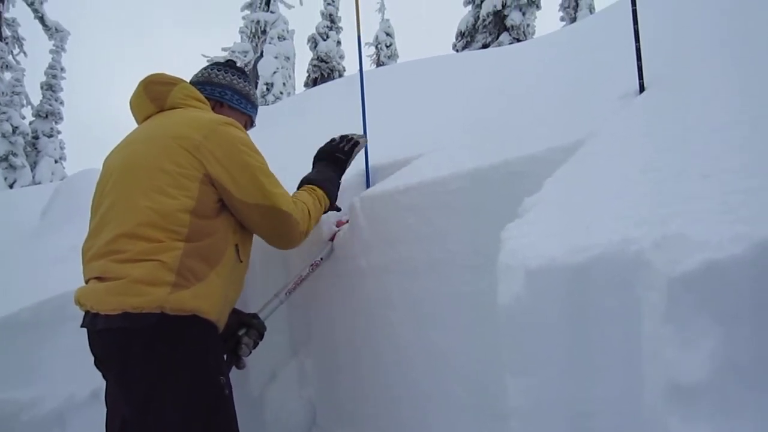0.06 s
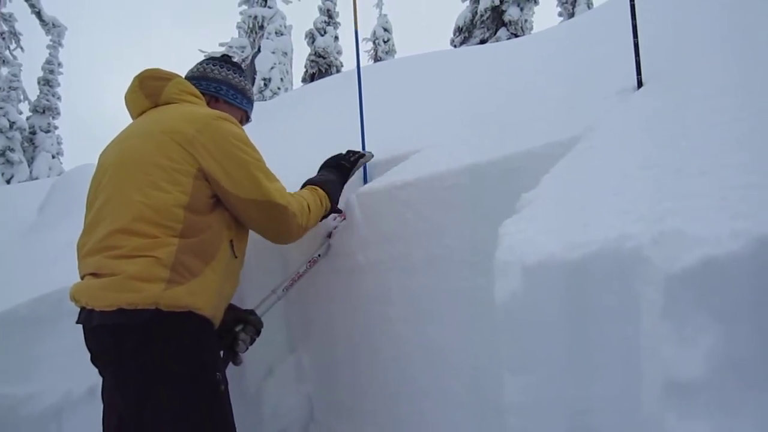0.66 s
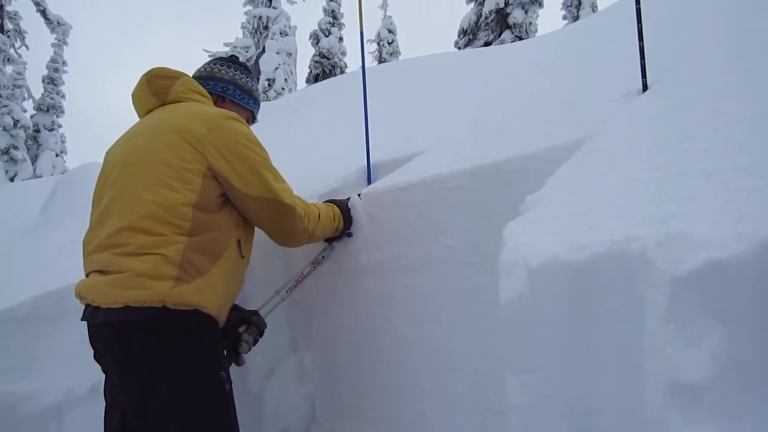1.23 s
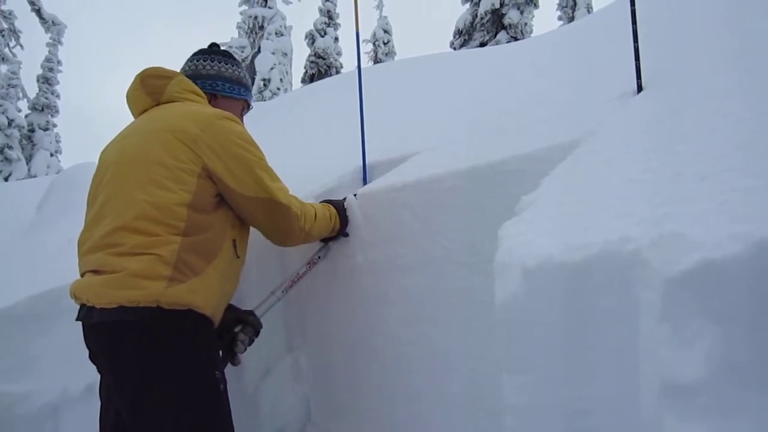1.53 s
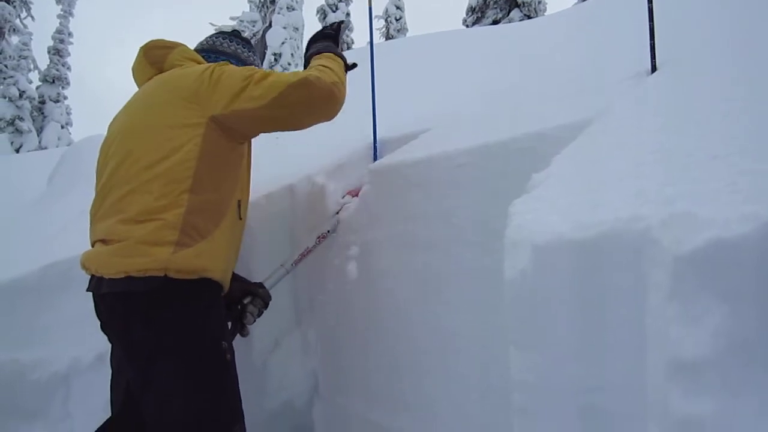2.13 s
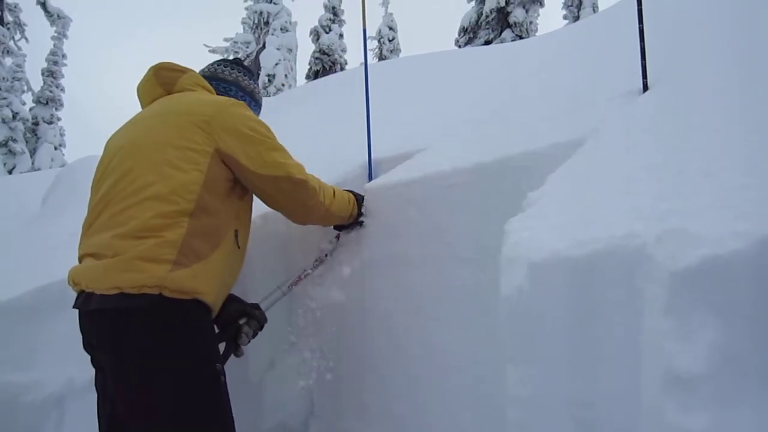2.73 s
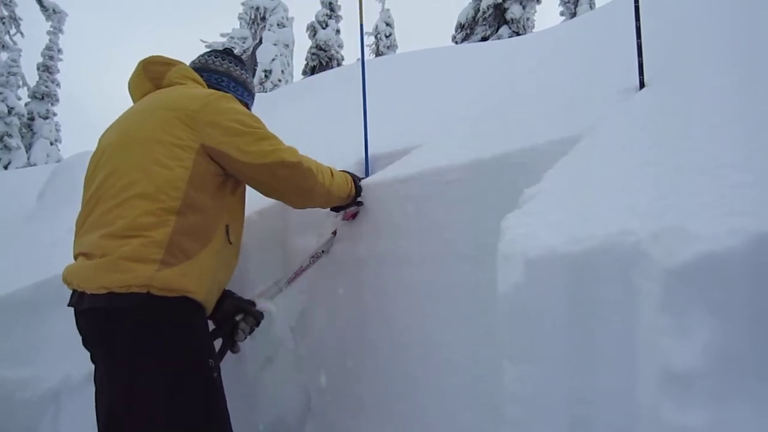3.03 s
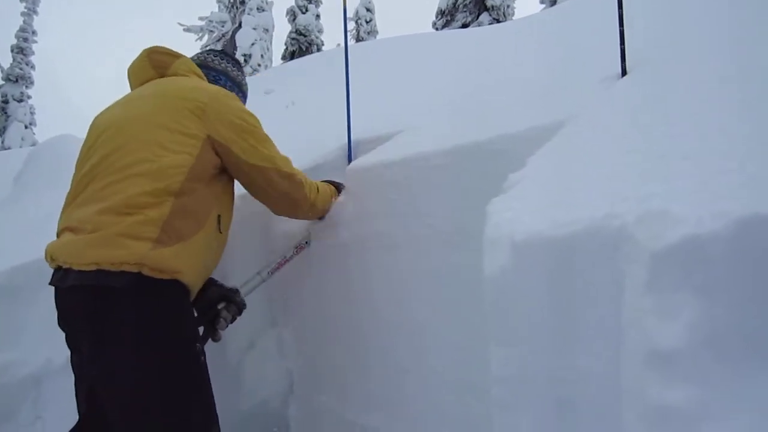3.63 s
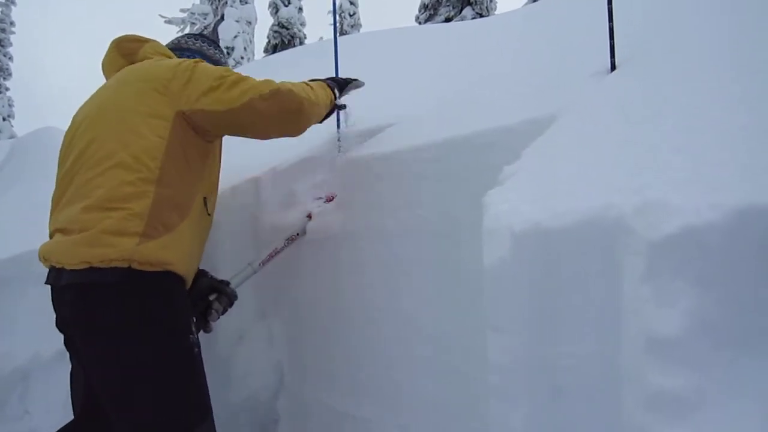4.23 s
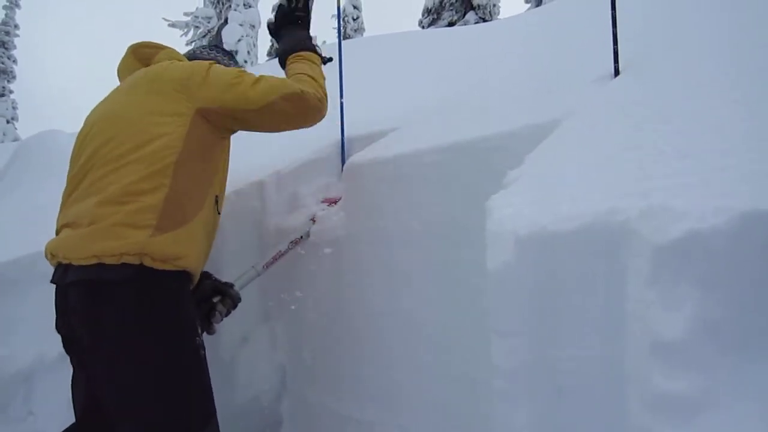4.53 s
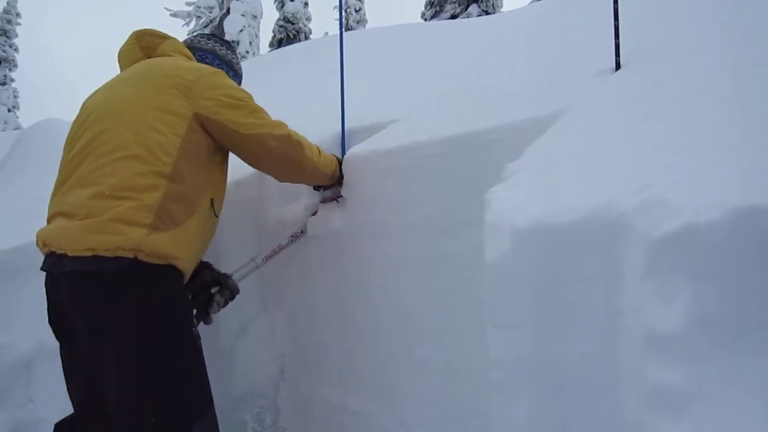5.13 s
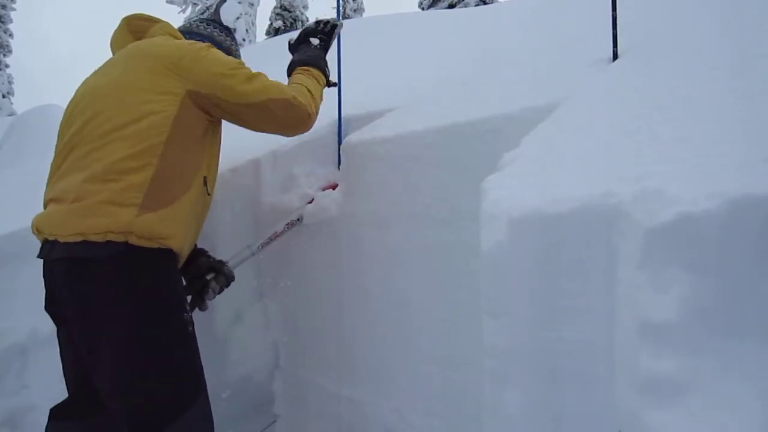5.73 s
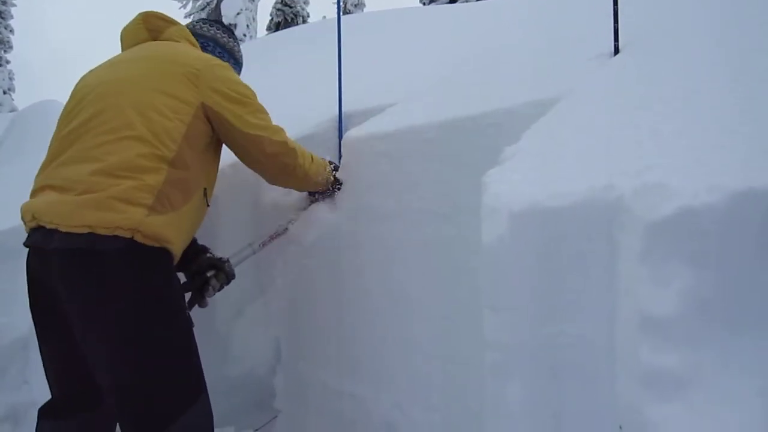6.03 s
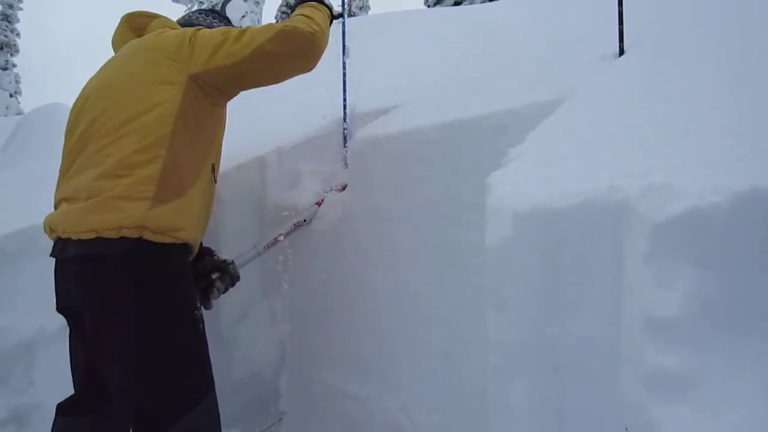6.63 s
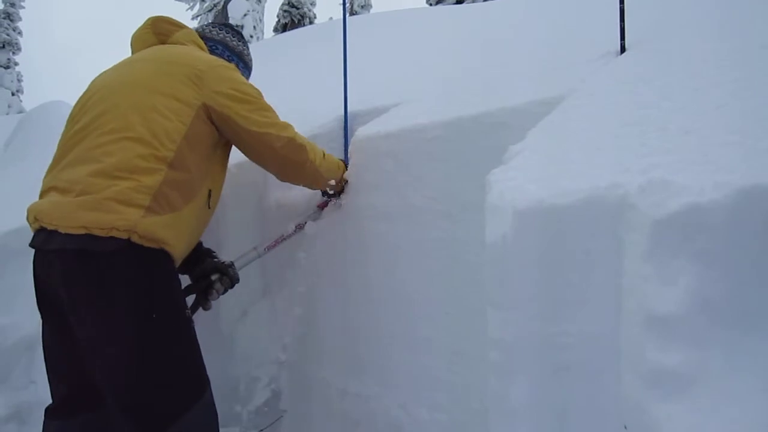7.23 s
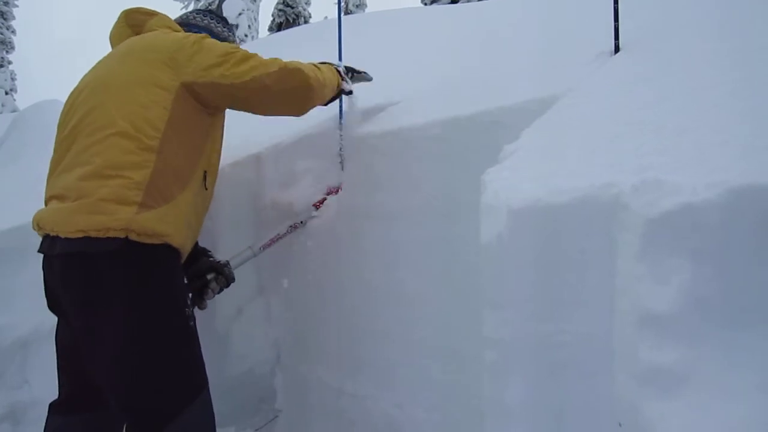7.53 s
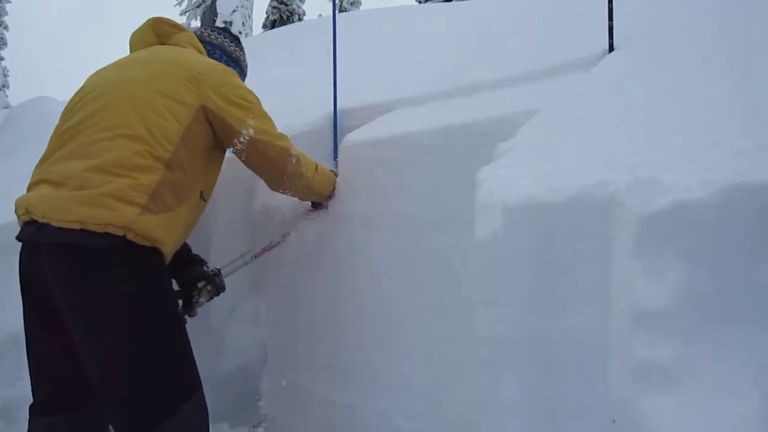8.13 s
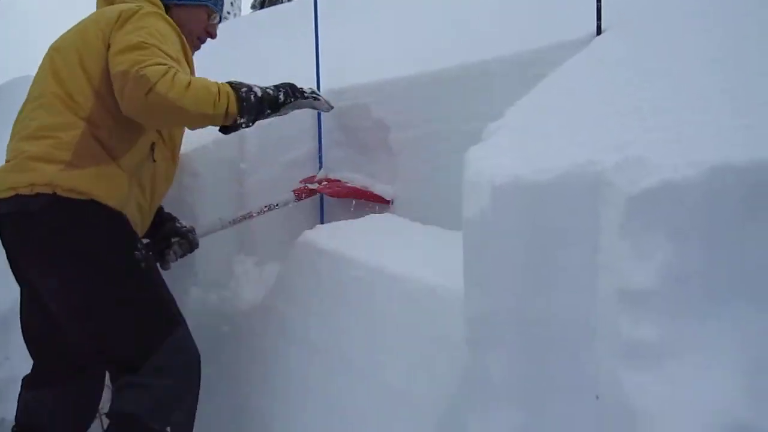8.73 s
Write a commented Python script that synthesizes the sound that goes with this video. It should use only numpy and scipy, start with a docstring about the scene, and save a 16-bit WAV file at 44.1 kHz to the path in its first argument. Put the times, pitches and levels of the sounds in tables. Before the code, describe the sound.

A gloved hand slaps a metal shovel on snow, twice lightly and six times hard, then a snow slab slides off with a grainy hiss.

```python
"""An open snow pit. A gloved hand slaps a metal shovel blade lying on a snow column: two light taps,
then six hard blows, the hardest of which overload the microphone. Each impact excites the blade's modes,
the snow damps them at once, and the slope returns dull echoes. A jacket swishes by friction as the arm
lifts and falls, loose gear knocks and crumbs of snow patter. At the last blow the column breaks and the
slab slides off with a grainy hiss."""
import sys
import numpy as np
from scipy import signal
from scipy.fft import rfft, irfft
from scipy.io import wavfile
from scipy.ndimage import uniform_filter1d

SR = 44100
rng = np.random.default_rng(int(sys.argv[2]) if len(sys.argv) > 2 else 0)


def put_to_file(sound):
    """Save the sound as 16-bit audio at rate SR, in the file named by the first command-line argument."""
    columns = np.atleast_2d(sound).T  # one column per channel
    safe = np.clip(columns, -1, 1)
    whole_steps = np.round(safe * 32767)
    wavfile.write(sys.argv[1], SR, whole_steps.astype(np.int16))


N = 386757
TIME = np.arange(N) / SR
AGE = TIME[:SR // 5]  # seconds since an impact

# The blows. Each row: start in seconds, force in dB, timing offset of the fingertip tick in seconds
# (0 for no tick), flex level in dB, flex frequency in Hz, crack level in dB, ring level in dB,
# bite level in dB, bite frequency in Hz.
BLOWS = [(0.1581, -20, .0026, -12.5, 770, -23.5, -27.5, -17.5, 3500),
         (1.1157, -16.5, .0027, -15, 810, -18, -31.5, -14, 3700),
         (2.538, -9.5, 0.00039, -2.5, 779, -10.5, -19.5, -14.5, 2020),
         (3.6258, -4.5, 0.00023, -3.5, 823, -12.5, -19.5, -5.5, 3250),
         (4.6835, -0.5, 0.000068, -5, 847, -9.5, -17.5, -13, 2340),
         (5.8375, -1, 0, -4.5, 890, -8.7, -22.5, -10, 1320),
         (6.9090, -2, 0.000093, -9, 820, -9, -21, -14, 3150),
         (7.9935, -1.5, 0, 0, 904.8, -10, -25, -14.5, 1245)]
# Modes. Each row: frequency in Hz, relative level in dB, time to decay by 60 dB (t60) in seconds.
BLADE_MODES = [(436, -2, 0.021), (527, -3.5, 0.034), (1138, -1.5, .025), (1478, -3.5, 0.034),
               (2222, -5.5, 0.038), (2430, -7, 0.029), (2744, 2.5, .035), (3042, -1, 0.035),
               (3370, -7.5, 0.042), (3910, -5, .034), (4650, -8, 0.047), (5440, -15, 0.051),
               (6630, -17, .04), (7500, -17, 0.053), (8050, -14, 0.027)]  # the blade, damped by snow
GEAR_MODES = [(765, 2, 0.024), (1020, -1, 0.015), (1270, -4, .025), (1709, -2, 0.017), (2200, -2.5, 0.02),
              (2480, 1.5, 0.0074), (3120, -4, 0.011), (4100, -11, .007), (5930, -2, 0.015),
              (6740, -3, .007)]  # loose gear
CLINK_MODES = [(2180, 0, 0.061), (3200, 1.5, 0.051), (3280, -2, 0.052)]  # a small metal part
# Echoes from slope and trees. Each row: delay in seconds, gain in dB, centre in Hz, filter width in Hz.
ECHOES = [(.0405, -36, 260, 200), (.0645, -26.5, 408, 190), (.0835, -32, 400, 150)]
# The sliding slab. Each row: time in seconds, base level of the grinding in dB, that of the fizz in dB.
SLIDE_LEVELS = [(8.02, -51, -48), (8.05, -45.5, -35), (8.07, -41, -34), (8.13, -44, -40.5),
                (8.332, -42.5, -44.5), (8.478, -44, -35), (8.584, -44.5, -39), (8.616, -41, -32),
                (8.76, -35.5, -37)]
# The shovel scuffing under the glove. Each row: start in seconds, level in dB, t60 in seconds.
RATTLES = [(0.507, -46, .015), (2.896, -43, .02), (2.93, -46, .034), (4.766, -38.5, .022),
           (4.776, -40.5, 0.053), (5.9176, -38, 0.068), (5.991, -43.5, .017), (6.992, -43, .05)]
# Clear knocks of the gear. Each row: start in seconds, level in dB, favoured frequency in Hz.
KNOCKS = [(1.9676, -29, 2220), (2.237, -45, 1370), (3.440, -46.5, 2700), (5.283, -43, 1100),
          (5.812, -44.5, 1000), (6.745, -45.5, 1100), (7.108, -49, 1100)]
# Sleeve rubs between blows. Each row: middle in seconds, half length in seconds, swish level in dB.
SLEEVE_RUBS = [(1.83, .043, -58), (2.05, .1, -63.5), (2.42, .025, -55), (2.643, 0.094, -59.5),
               (3.005, 0.027, -54.5), (3.056, 0.019, -50.5), (3.23, .03, -59.5), (4.117, .022, -53),
               (4.234, .0083, -52.5), (5.2, .03, -57), (6.331, .018, -52.5), (6.384, .014, -49.5),
               (6.56, .03, -60.5), (7.02, .085, -54), (7.368, 0.054, -53.5), (7.409, .028, -52)]
# Lift, downswing and follow-through at full force. Each row: middle in seconds after the blow,
# half length in seconds, swish level in dB, rustle level in dB.
ARM_SWING = [(-.45, .16, -72, -63.5), (-.025, 0.037, -59.5, -60), (0.062, 0.092, -58.5, -58)]
# The jacket's continuous rustle. Each row: time in seconds, level in dB.
RUSTLE_LEVELS = [(0, -58), (.17, -54.5), (.6, -73), (1.7, -75), (2.3, -63), (5.2, -63), (6.1, -72),
                 (8, -68)]
# Noise spectra. Each row: frequency in Hz, relative spectral density in dB.
CRACK_SPECTRUM = [(100, -12), (330, 0.5), (520, 13.5), (1000, -5), (1400, 5), (1800, -8.5), (2900, -3),
                  (4200, -3.5), (5000, -5), (7300, -5), (8800, -11.5), (10300, -9.5), (13000, -18),
                  (16000, -28)]  # glove on metal
GRIND_SPECTRUM = [(60, -27), (220, -11.5), (450, -12), (750, -1.5), (1080, 1.5), (1300, -1.5), (1500, -7.5),
                  (1750, -3.5), (2200, -21.5), (5000, -37)]  # sliding snow, hollow middle range
HISS_SPECTRUM = [(300, -28), (1500, -18), (2400, -5.5), (3000, -2.5), (3800, -0.5), (5000, -5.5),
                 (6500, -6), (12000, -33)]  # sliding snow, treble
FIZZ_SPECTRUM = [(3000, -20), (5000, -10), (6200, -1), (7300, -2), (8500, -2.5), (11000, -5.5),
                 (14000, -10.5), (16000, -14)]  # sliding snow, high treble
SWISH_SPECTRUM = [(300, -37.5), (1500, -11.5), (3200, 4.5), (5000, -3.5), (7000, -1.5), (11000, -6.5),
                  (16000, -18)]  # nylon on nylon
RUSTLE_SPECTRUM = [(60, -10), (300, 1), (600, -3.5), (950, 1.5), (1600, -5), (3000, -7.5), (6000, -26),
                   (16000, -30)]  # folding cloth
AIR_SPECTRUM = [(12, -29), (20, 4.5), (107, -6), (228, -5), (293, -5.5), (422, -6.5), (513, -6), (759, -7),
                (923, -7), (1260, -9), (1370, -10), (5230, -15), (16000, -23)]  # open air


def slaps():
    """Impact excitation: each blow thumps the column and sets the snow-damped blade briefly ringing."""
    shudder_spectrum = [(25, -8.5), (80, -7.5), (250, 0.5), (380, -10.5), (600, -13.5),
                        (1200, -19.5), (5000, -39.5)]
    out = np.zeros(N)
    for s, force_db, offset_s, flex_db, flex_hz, crack_db, ring_db, bite_db, bite_hz in BLOWS:
        if offset_s:  # fingertips tick just ahead of the palm on the light taps, with it on hard blows
            fingertips = amp(-21.5) * pulse(hz=950, peak_s=0.0014) + amp(-22) * crack(t60=0.025)
            add(out, s - offset_s + .0004, fingertips)
        thump_hz = 250 * 2 ** (0.04 * force_db)  # a harder blow packs the snow and thumps higher
        add(out, s, amp(force_db) * pulse(thump_hz, peak_s=0.0015))
        add(out, s + 0.00029, amp(flex_db) * pulse(flex_hz, peak_s=.95 / flex_hz))
        add(out, s + .0005, amp(crack_db) * crack(t60=.03))
        blade = ring(BLADE_MODES, scatter_db=-0.3, detune=0.013) * (1 - decay(t60=0.013))
        add(out, s + 0.001212, amp(ring_db) * blade)
        # the bite: the spot where the hand lands brings out one range of the blade
        add(out, s + .001, amp(bite_db) * pulse(bite_hz, peak_s=0.00079))
        # the packed snow under the blade shudders a little longer
        shudder = coloured(rng.standard_normal(len(AGE)), shudder_spectrum)
        envelope = decay(t60=0.15) * (1 - decay(t60=.03))
        add(out, s + 0.0043, amp(-34.5 + .5 * force_db) * shudder * envelope)
        rebound_s = .0148 - .00056 * force_db  # the blade jumps and lands again, sooner when hit hard
        add(out, s + rebound_s, amp(-34) * rattle(t60=.018))
    return out


def pulse(hz, peak_s):
    """A heavily damped oscillation that begins with a rarefaction."""
    rise = AGE / peak_s
    return -np.sin(2 * np.pi * hz * AGE) * (rise * np.exp(1 - rise)) ** 2


def crack(t60):
    """Contact noise: a sharp snap as the glove lands, then a short crunch as it presses home."""
    pressing = (decay(t60) + 0.76 * decay(t60=0.0046)) * (1 - decay(t60=.0022))
    return coloured(grains(len(AGE), spread_db=2.5), CRACK_SPECTRUM) * pressing


def ring(modes, scatter_db, detune):
    """Free vibration: decaying modes of alternating sign, varying a little in level and tuning."""
    out = np.zeros(len(AGE))
    for k, (hz, db, t60) in enumerate(modes):
        level_draw, pitch_draw = rng.standard_normal(2)
        tone = np.sin(2 * np.pi * hz * (1 + detune * pitch_draw) * AGE)
        out += (-1) ** k * amp(db + scatter_db * level_draw) * tone * decay(t60)
    return out


def echoes(blows):
    """Reflection with absorption: snow takes up the treble, so only a low band of each blow returns."""
    out = np.zeros(N)
    for delay_s, db, hz, width_hz in ECHOES:
        once_filtered = resonance(blows, hz, width_hz)
        add(out, delay_s, amp(db) * resonance(once_filtered, hz, width_hz))
    return out


def slab():
    """Stick-slip friction: ice grains shear under the sliding block, which grinds, hisses and fizzes."""
    times, *levels = np.transpose(SLIDE_LEVELS)
    grind_db, fizz_db = (np.interp(TIME, times, level) for level in levels)
    hiss_db = grind_db + .4 * (fizz_db - grind_db)
    release = np.clip((TIME - BLOWS[-1][0]) / 0.02, 0, 1)
    stick_slip = unit_rms(uniform_filter1d(rng.standard_normal(N), size=400))
    grind = amp(grind_db + 0.25 + 0.8 * stick_slip) * coloured(grains(N, spread_db=3.5), GRIND_SPECTRUM)
    hiss = amp(hiss_db + 2.5 + 0.6 * stick_slip) * coloured(grains(N, spread_db=1.5), HISS_SPECTRUM)
    fizz = amp(fizz_db + .4 + 0.4 * stick_slip) * coloured(grains(N, spread_db=0.7), FIZZ_SPECTRUM)
    return release * (grind + hiss + fizz)


def shovel_rattles():
    """Intermittent contact: the shovel shifts under the resting hand."""
    out = np.zeros(N)
    for s, db, t60 in RATTLES:
        add(out, s, amp(db) * rattle(t60) * (1 - decay(t60=.12 * t60)))
    return out


def rattle(t60):
    """Brief contact gives a broad spectrum: a light touch of metal makes a bright tick."""
    spectrum = [(200, -5), (1800, -6), (3200, -1.5), (5000, -5.5), (7500, -4.5),
                (11000, -8.5), (16000, -24)]
    return coloured(grains(len(AGE), spread_db=4.0), spectrum) * decay(t60)


def loose_gear():
    """Light collisions: gear knocks a few times, jostles faintly around the hard blows and clinks once."""
    out = np.zeros(N)
    for s, db, favoured_hz in KNOCKS:
        add(out, s, amp(db) * knock(favoured_hz))
    for s in rng.uniform(KNOCKS[1][0], BLOWS[-1][0], size=22):
        jostle_db = -53.5 + 0.5 * rng.standard_normal()
        add(out, s, amp(jostle_db) * knock(favoured_hz=1050))
    add(out, s=3.177, sound=amp(-46) * ring(CLINK_MODES, scatter_db=1, detune=.005))
    return out


def knock(favoured_hz):
    """Selective excitation: a hollow click that favours the gear's modes near one frequency."""
    modes = [(hz, db - 4 * np.log2(hz / favoured_hz) ** 2, t60) for hz, db, t60 in GEAR_MODES]
    return ring(modes, scatter_db=0.3, detune=0.012)


def jacket():
    """Friction noise: nylon rubs and folds with each arm movement, and incoherent sounds add in power."""
    moves = [(s, half_s, db, db - 4) for s, half_s, db in SLEEVE_RUBS]  # rustle 4 dB below swish
    for s, force_db, *_ in BLOWS:
        size_db = 0.34 * force_db  # a harder blow takes a bigger swing
        for after_s, half_s, swish_db, rustle_db in ARM_SWING:
            moves.append((s + after_s, half_s, swish_db + size_db, rustle_db + size_db))
    swish_power = np.zeros(N)
    rustle_power = amp(np.interp(TIME, *np.transpose(RUSTLE_LEVELS))) ** 2
    for s, half_s, swish_db, rustle_db in moves:
        near = abs(TIME - s) < 4 * half_s
        swell = np.exp(-((TIME[near] - s) / half_s) ** 2)
        swish_power[near] += amp(swish_db) ** 2 * swell
        rustle_power[near] += amp(rustle_db) ** 2 * swell
    swish = np.sqrt(swish_power) * coloured(grains(N, spread_db=4.5), SWISH_SPECTRUM)
    rustle = np.sqrt(rustle_power) * coloured(grains(N, spread_db=4.5), RUSTLE_SPECTRUM)
    return swish + rustle


def crumbs():
    """Shot noise: after each of the last four blows, crumbs of snow land at random and thin out."""
    landings_per_s = sum(4 * np.exp(-np.clip(TIME - s, 0, None) / .35) * (TIME > s + .04)
                         for s, *_ in BLOWS[4:])  # in each band
    out = np.zeros(N)
    for hz in np.geomspace(900, 6500, num=12):
        landings = (rng.random(N) < landings_per_s / SR) * amp(rng.uniform(-8, 0, N))
        noise_band = unit_rms(resonance(rng.standard_normal(len(AGE)), hz, width_hz=1.2 * hz))
        out += signal.oaconvolve(landings, noise_band * decay(t60=0.027))[:N]
    return amp(-52) * out


def air():
    """Stationary noise: a faint, even wash of open air."""
    return amp(-57.5) * coloured(rng.standard_normal(N), AIR_SPECTRUM)


def amp(db):
    """Amplitude ratio of a level in decibels."""
    return 10 ** (np.asarray(db) / 20)


def unit_rms(x):
    """Normalisation to an rms of one."""
    return x / np.sqrt(np.mean(x ** 2) + 1e-20)


def add(mix, s, sound):
    """Superposition: a sound joins the mix at s seconds."""
    part = mix[round(s * SR):][:len(sound)]
    part += sound[:len(part)]


def coloured(x, spectrum):
    """Spectral shaping, to an rms of one. Each row of the spectrum: frequency in Hz, level in dB."""
    hz, db = np.transpose(spectrum)
    bin_hz = np.fft.rfftfreq(len(x), 1 / SR)
    gain = amp(np.interp(np.log(bin_hz + 1), np.log(hz), db))
    return unit_rms(irfft(rfft(x) * gain, len(x)))


def grains(count, spread_db):
    """Granular noise: dense tiny clicks of uneven size."""
    return rng.standard_normal(count) * amp(spread_db * np.minimum(rng.exponential(1, count), 5))


def decay(t60):
    """Exponential damping: a fall of 60 dB in t60 seconds."""
    return np.exp(-np.log(1000) * AGE / t60)


def resonance(x, hz, width_hz):
    """A second-order resonator passes one band."""
    return signal.lfilter(*signal.iirpeak(hz, hz / width_hz, fs=SR), x)


def scene():
    """Superposition of the blows, their echoes and the quieter sources, alike in both channels."""
    blows = slaps()
    mono = blows + echoes(blows) + shovel_rattles() + loose_gear() + jacket() + slab() + air() + crumbs()
    return np.array([mono, mono])


def record(dry):
    """Saturation: the microphone sheds the deepest bass, overloads with a firm knee and is band-limited."""
    bass_cut_hz, ceiling, band_limit_hz = 46, .71, 15850
    lean = signal.sosfilt(signal.butter(2, bass_cut_hz, "highpass", fs=SR, output="sos"), dry)
    clipped = lean / (1 + (lean / ceiling) ** 8) ** (1 / 8)
    lowpass = signal.firwin(511, band_limit_hz, window=("kaiser", 9), fs=SR)
    return signal.oaconvolve(clipped, lowpass[None], "same", axes=1)


dry = scene()
out = record(dry)
put_to_file(out)
```